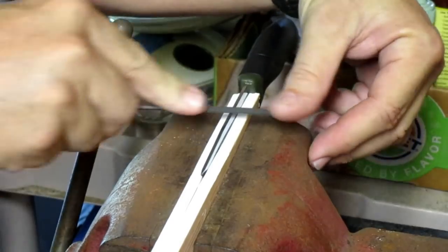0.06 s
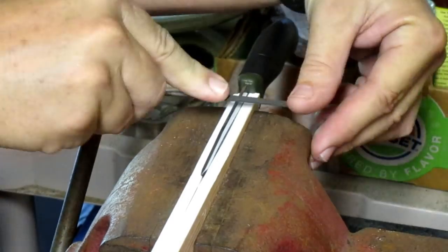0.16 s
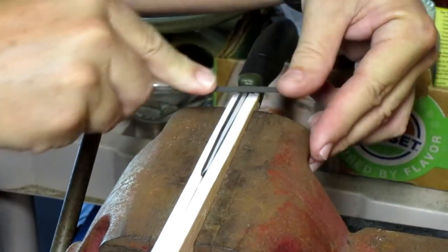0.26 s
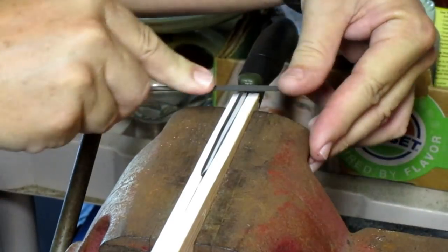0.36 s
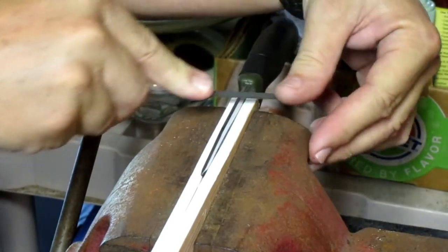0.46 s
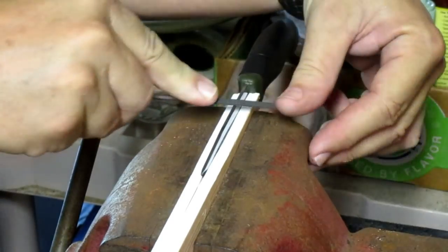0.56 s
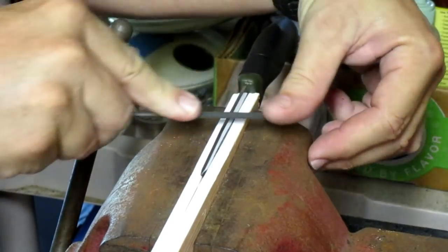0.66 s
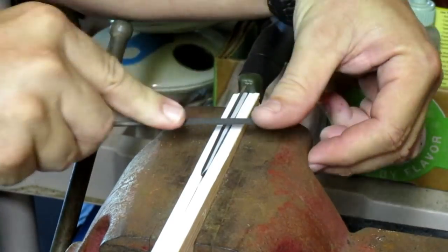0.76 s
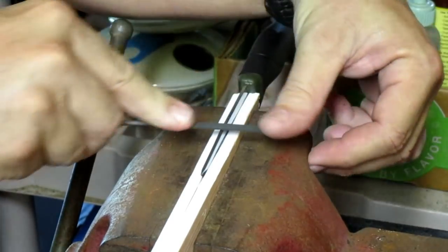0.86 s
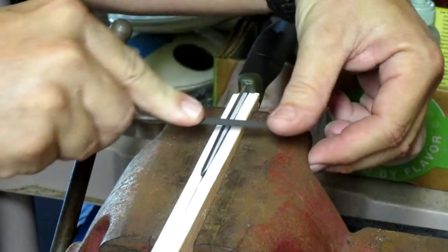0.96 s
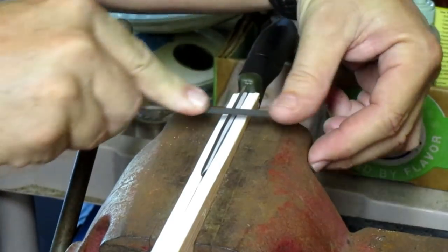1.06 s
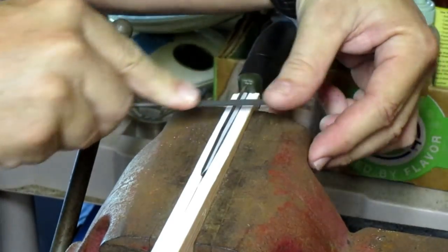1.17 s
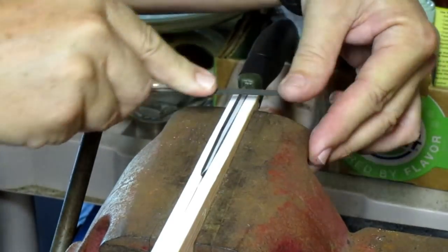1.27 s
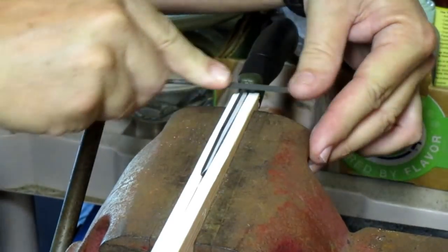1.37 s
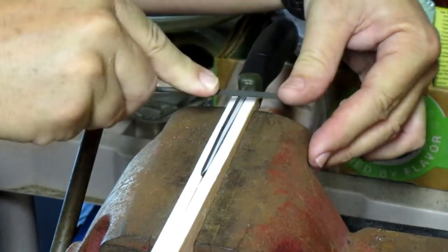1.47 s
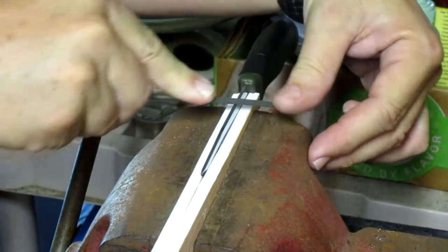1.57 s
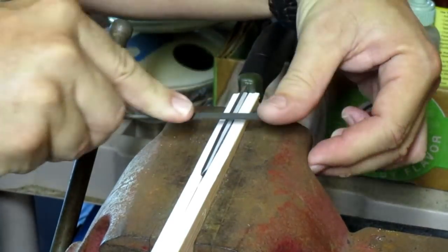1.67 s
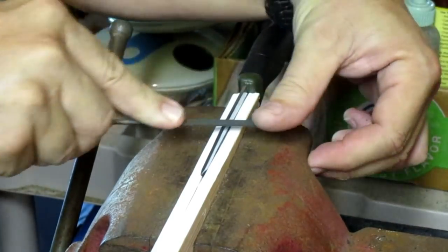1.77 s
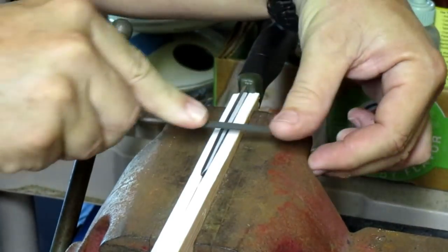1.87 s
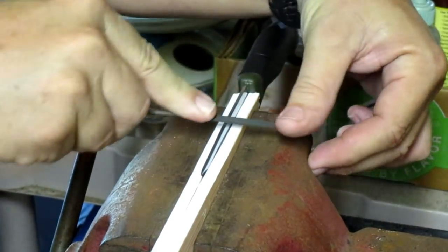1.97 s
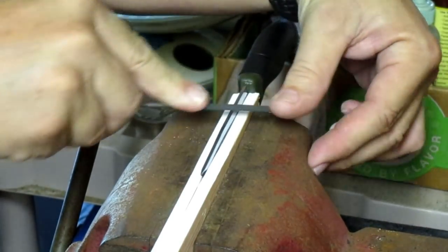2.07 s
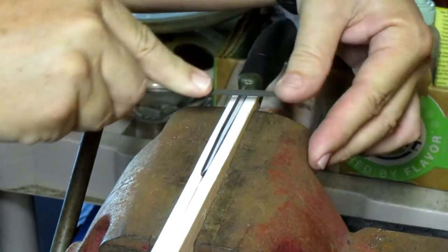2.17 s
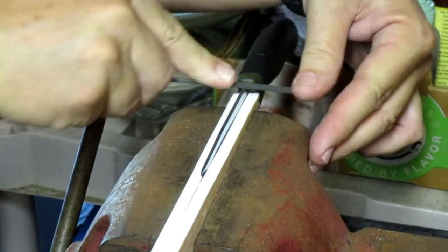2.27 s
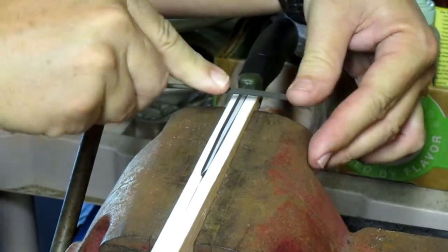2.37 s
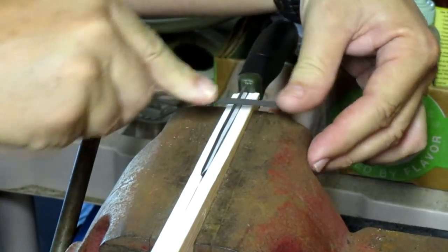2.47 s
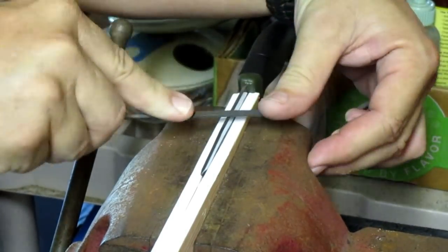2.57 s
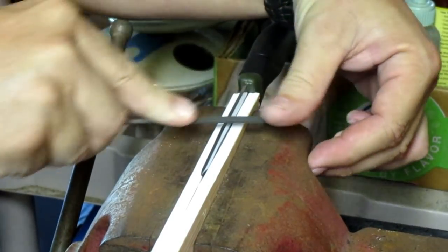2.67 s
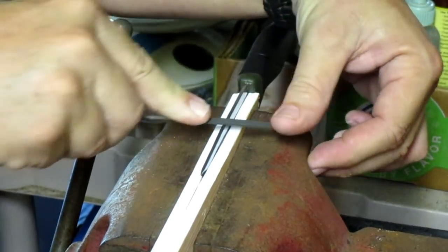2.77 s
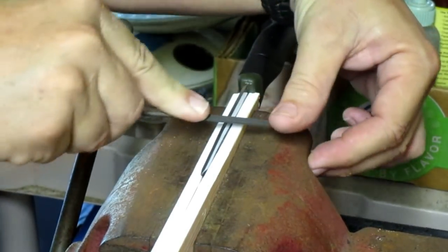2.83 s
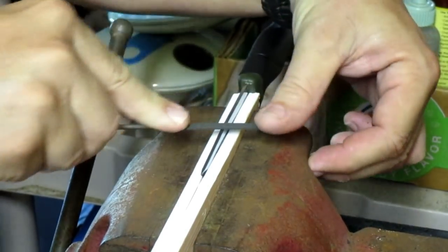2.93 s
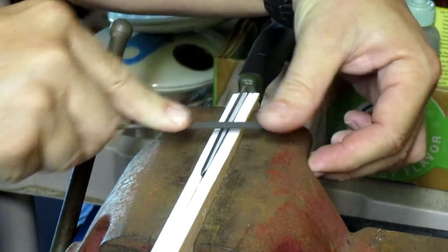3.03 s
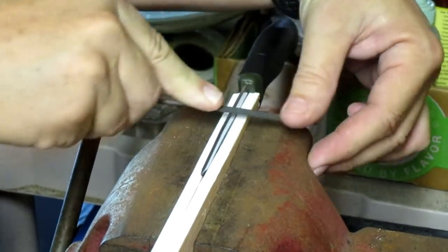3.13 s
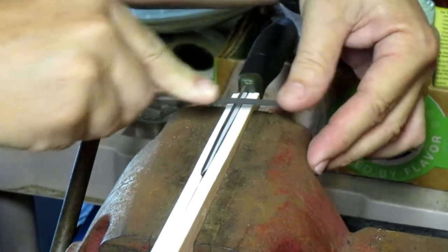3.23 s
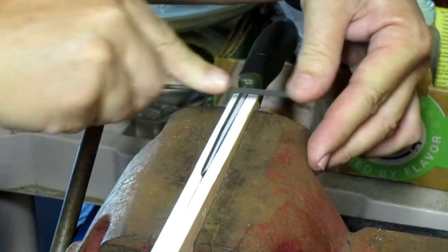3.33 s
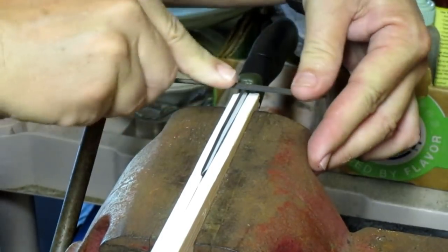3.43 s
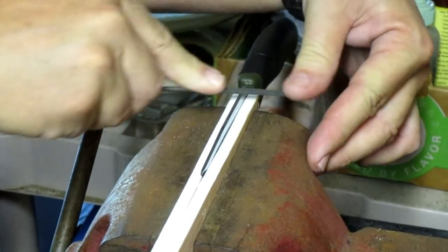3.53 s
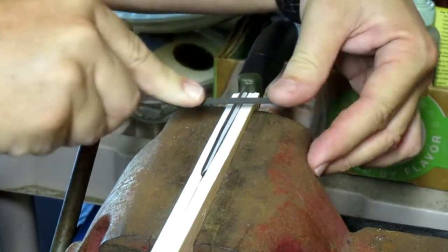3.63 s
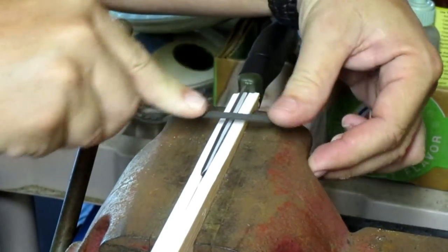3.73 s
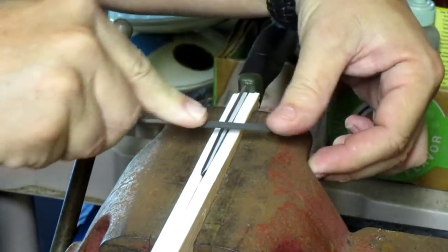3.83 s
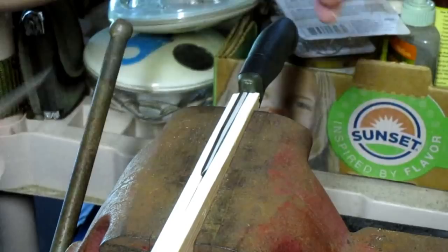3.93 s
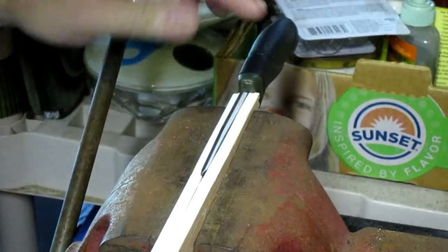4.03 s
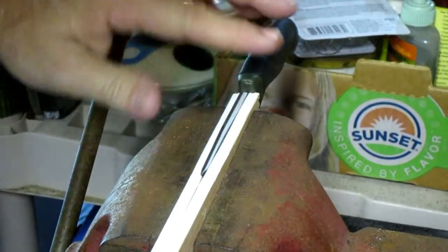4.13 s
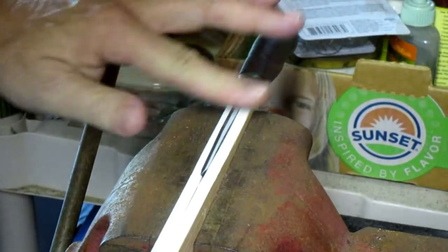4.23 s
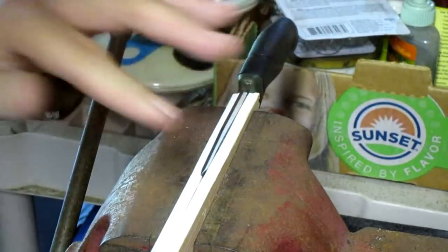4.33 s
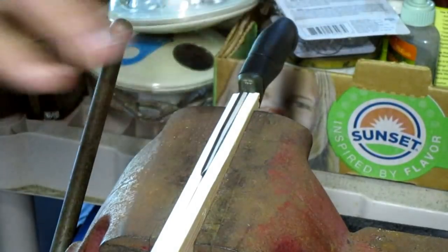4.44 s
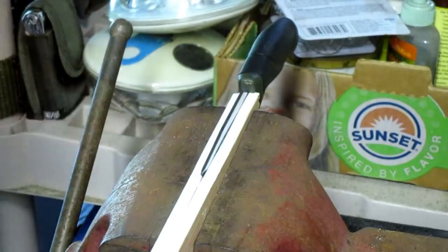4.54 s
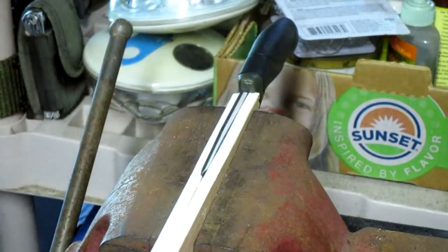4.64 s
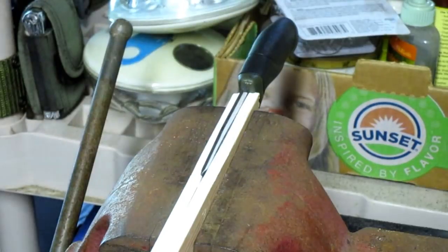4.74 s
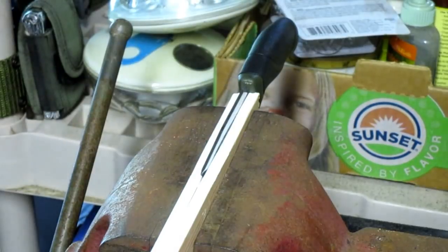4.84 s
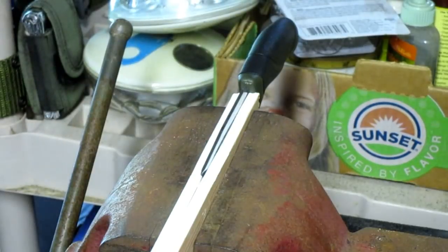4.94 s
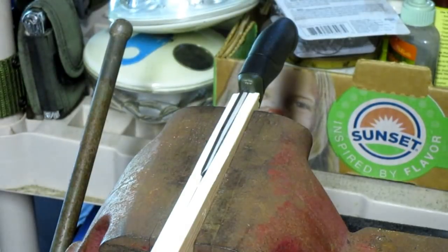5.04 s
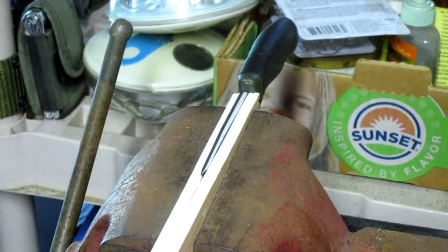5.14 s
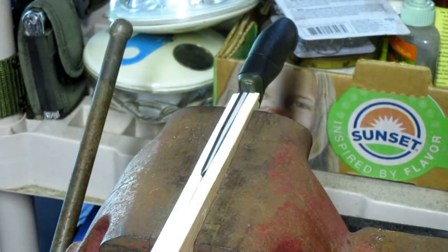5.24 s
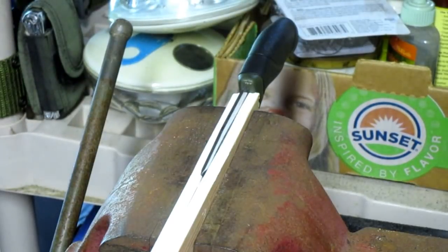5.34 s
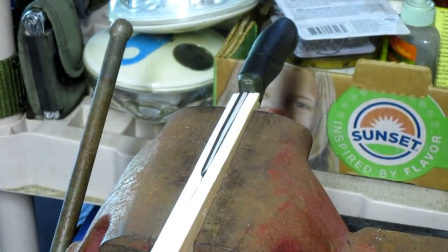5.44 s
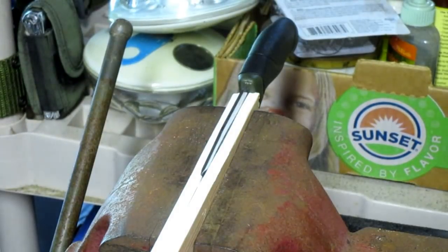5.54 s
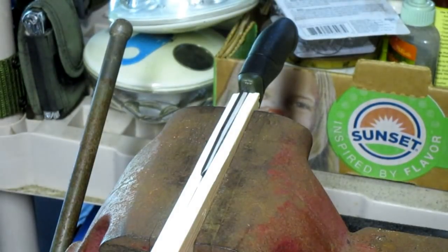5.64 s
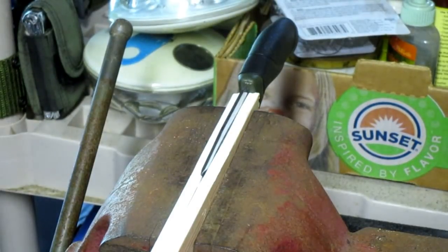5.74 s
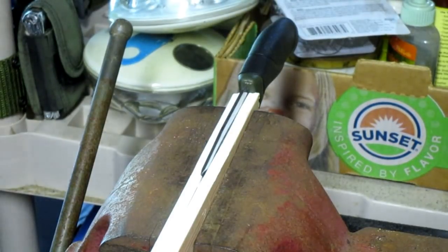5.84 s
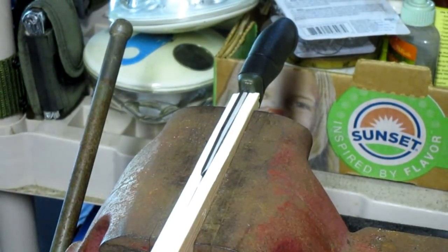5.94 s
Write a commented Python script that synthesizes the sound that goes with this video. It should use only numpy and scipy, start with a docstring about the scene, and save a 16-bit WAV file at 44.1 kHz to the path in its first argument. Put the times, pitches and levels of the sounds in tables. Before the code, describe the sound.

Rapid metallic rasping fills the first four seconds: short harsh strokes in a hurried, irregular rhythm, their tone shifting as the file wanders along the blade. Filing ends dead, leaving quiet air and low wavering hum in a small dry workshop. A few dull bench knocks and tiny metal clicks follow near the end. Close stereo microphone, narrow bass, wider treble.

```python
"""A small hand file is worked quickly to and fro across a steel blade clamped in a bench vise, heard close by.
Its teeth catch and slip a few hundred times a second; this force drives the modes of file, blade and vise,
the vise most when the file is far out on the overhanging blade. Filtered noise makes the bench rumble.
The filing stops dead; soft thumps (damped sines) and small clicks (noise bursts ringing tools) follow,
over the low wavering hum, rumble and air noise of the workshop."""
import sys
import numpy as np
from scipy import signal
from scipy.fft import rfft, irfft
from scipy.io import wavfile
from scipy.ndimage import uniform_filter1d

SR = 44100
rng = np.random.default_rng(int(sys.argv[2]) if len(sys.argv) > 2 else 0)


def dump(signal):
    """Clip the signal to [-1, 1] and save it as 16-bit WAV at the path in sys.argv[1]."""
    limited = np.clip(np.atleast_2d(signal).T, -1, 1)
    pcm = np.round(limited * 32767).astype(np.int16)
    wavfile.write(sys.argv[1], SR, pcm)


N = 264600

# spectrum of the workshop air: [f/Hz, relative level/dB]
AIR_SPECTRUM = [(40, -20), (110, 0), (190, -11), (290, -11), (400, -17), (850, -20), (1500, -25),
                (4000, -32), (8500, -38), (16000, -58)]
# rocking of the bench under the strokes: [t/s, level/dB]
ROCKING_LEVEL = [(0, -32.5), (.6, -33.5), (1.2, -34.5), (2, -32), (3.95, -38)]
# spectrum of the rocking bench: [f/Hz, relative level/dB]
BENCH_SPECTRUM = [(15, -13), (25, 5), (38, 0.5), (55, -10.5), (80, -9.5), (120, -22), (170, -13.5),
                  (230, -23.5), (400, -41), (2000, -110)]
# soft thumps against the bench: [t/s, peak level/dB, f/Hz, t60/s]
BENCH_THUMPS = [(4.25, -26.5, 54.6, 0.14), (5.387, -22, 180, 0.17), (5.401, -20, 148, 0.053),
                (5.417, -23.5, 48, 0.13), (5.519, -26.5, 176, 0.09), (5.531, -26, 61, 0.1)]
# small clicks of tools being handled: [t/s, peak level/dB, t60/s]
TOOL_CLICKS = [(4.008, -34.5, 0.071), (5.496, -30.5, 0.34), (5.5205, -18, 0.022), (5.526, -24, 0.016),
               (5.599, -36, 0.073), (5.841, -36, 0.2), (5.882, -34, 0.079), (5.91, -39.5, 0.5),
               (5.974, -41, .04)]
# resonances of the tools: [f/Hz, width/Hz, relative level/dB]
TOOL_MODES = [(620, 270, 0.5), (1410, 290, 1), (1940, 230, 5), (2800, 900, -1.5), (5160, 2100, -13)]
# resonances of vise, blade and file: [f/Hz, width/Hz, relative level/dB]
STEEL_MODES = [(391.3, 51, -16), (498.6, 63, -13), (549.6, 40, -6.5), (843.7, 60, -12.5), (1064, 37, -19.5),
               (1200, 65, -14.5), (1317, 100, -16), (1458, 54, -16), (1694, 195, -11), (1806, 70, -8),
               (1921, 51, -7), (2007, 55, -9.5), (2241, 57, -6.5), (2317, 110, -3), (2478, 59, 1),
               (2810, 120, -16.5), (3170, 95, -6), (3280, 135, -6.5), (3436, 97, -8.5), (3550, 120, -7),
               (3713, 73, -2.5), (3874, 89, -7.5), (4227, 460, -13), (4920, 240, -19.5), (5296, 210, -12),
               (5880, 420, -10), (6030, 77, -11.5), (7154, 116, -11.5), (7510, 150, -14.5),
               (8570, 180, -23.5), (10230, 154, -17), (11255, 300, -19.5)]
# broad crack of the contact beneath the resonances: [f/Hz, relative level/dB]
CONTACT_CRACK = [(100, -19), (300, -35), (1000, -34), (1600, -39), (2800, -15.5), (4000, -20), (6500, -21),
                 (8500, -21.5), (10000, -24.5), (14600, -28), (16000, -65)]
# a tooth snags hard and lets go: [t/s, peak level/dB]
TOOTH_SNAGS = [(.060, -6), (.331, -7), (.573, -5), (.647, -9), (.693, -7), (1.603, -10), (1.854, -8),
               (1.995, -8), (2.529, -8), (2.646, -8), (2.817, -7), (3.242, -16), (3.2485, -5), (3.369, -17)]
# strokes of the file: [start t/s, length/s, level/dB, swell from first half to second half/dB]
FILE_STROKES = [(0.003, 0.03, -23.5, -13), (0.034, 0.04, -17.5, 2.0), (0.107, 0.032, -25.5, 0.5),
                (0.166, 0.041, -21.5, 3.5), (0.242, 0.031, -24.5, 5), (0.312, 0.034, -24, -3.5),
                (0.375, 0.038, -23.0, 2), (0.436, 0.046, -21.5, -3), (0.486, 0.041, -23.5, 2.0),
                (0.55, 0.057, -19.5, -2), (0.618, 0.038, -17.5, -3), (0.68, 0.04, -20, -4.5),
                (0.737, 0.045, -25.0, -3), (0.804, 0.05, -21.5, -6), (0.86, 0.049, -25.5, -3.0),
                (0.924, 0.034, -20.0, 0), (0.988, 0.05, -26.5, -1.5), (1.051, 0.044, -19.5, 4.5),
                (1.099, 0.038, -15.5, -0.5), (1.168, 0.051, -24.5, -0.5), (1.233, 0.037, -17, 0.5),
                (1.302, 0.039, -25.5, -0.5), (1.366, 0.035, -19.0, -3.0), (1.415, 0.046, -19.5, -7),
                (1.481, 0.028, -26.5, -1), (1.542, 0.021, -27.5, -8), (1.597, 0.043, -22.0, -4),
                (1.648, 0.034, -25.5, 7), (1.714, 0.033, -19, -0.0), (1.779, 0.035, -21.5, -3),
                (1.834, 0.048, -17.5, 0.0), (1.905, 0.032, -19, -6.0), (1.946, 0.062, -21.5, 0.0),
                (2.019, 0.036, -15.5, 0), (2.087, 0.04, -25.0, -1.5), (2.145, 0.041, -19.5, 0.5),
                (2.198, 0.04, -21.5, -1.5), (2.275, 0.047, -22.0, 5.5), (2.325, 0.036, -18.5, 3),
                (2.394, 0.034, -23, -4.5), (2.446, 0.048, -27.0, 2), (2.505, 0.055, -21.0, -5),
                (2.571, 0.04, -22, -0.5), (2.645, 0.047, -20.5, -4.5), (2.701, 0.038, -22.5, 8),
                (2.775, 0.028, -20.5, -5.5), (2.811, 0.056, -18.0, -8.5), (2.876, 0.044, -27.5, 4),
                (2.95, 0.062, -22.5, -4.5), (3.018, 0.053, -24.0, 4), (3.09, 0.062, -22.5, -8),
                (3.158, 0.046, -23.5, 4), (3.247, 0.036, -23.5, -2), (3.298, 0.052, -26.0, 4.5),
                (3.389, 0.036, -24.5, -7), (3.457, 0.034, -21.0, 0.5), (3.522, 0.033, -22.5, 1),
                (3.578, 0.042, -22.5, -6), (3.628, 0.051, -21.0, -0.5), (3.695, 0.043, -23, 2.0),
                (3.765, 0.066, -22.0, -1), (3.842, 0.047, -29.5, 6), (3.901, 0.034, -17.5, 1)]
# the file wanders out along the blade and back, about once a second:
# [t/s, overhang (0 over the jaws, 1 at the free end)]
BLADE_OVERHANG = [(0, 0.32), (.33, 0.76), (.5, 0.87), (.9, 0.025), (1.33, 0.88), (1.55, 0.47),
                  (2.03, 0.071), (2.35, 0.9), (2.55, .35), (2.9, 0.18), (3.42, 0.85), (3.93, 0.14)]
# treble balance of the strokes: [t/s, level/dB]
TREBLE_LEVEL = [(0, -0.5), (.62, 0.5), (.88, -6.5), (1.3, 0), (1.65, 2), (1.82, -3.5), (2.1, -1), (2.65, 0),
                (2.95, -3), (3.22, 4), (3.55, 2), (3.93, 0)]
# side against mid at the two microphone ports: [f/Hz, level/dB]
STEREO_WIDTH = [(150, -61), (380, -42), (1200, -40.5), (2400, -19), (4400, -11), (8000, -6), (14000, -1.5)]

TIME = np.arange(N) / SR  # s
SIZE = 8192  # samples in a body's frequency response
FREQ = np.maximum(np.fft.rfftfreq(SIZE, 1 / SR), 1)  # Hz
TOP_HZ = 15100
STOP_S = 3.933  # the filing ends
AIR_DB = -46
HUM_HZ, HUM_DB = 55, -43
VISE_DB, LEVERAGE_DB = -5, 11.5  # vise level over the jaws, and its rise towards the free end
# chatter (0-1) of an even stroke; one that starts hard and fades chatters more
CHATTER, CHATTER_PER_DB, CHATTER_SPREAD = 0.54, -0.06, 0.23


def undb(db):
    """Amplitude ratio: 20 dB is a factor of ten."""
    return 10 ** (np.asarray(db) / 20)


def unit(x):
    """Normalisation to an rms value of 1."""
    return x / np.sqrt(np.mean(x ** 2))


def add(out, start, sound):
    """Superposition: mix a sound into out from time start/s."""
    i = max(int(start * SR), 0)
    out[i:i + len(sound)] += sound[:N - i]


def curve(points, t):
    """Linear interpolation of a control curve at time t/s."""
    return np.interp(t, *np.transpose(points))


def colour(points, hz):
    """Spectral weighting: gain interpolated in dB over the logarithm of frequency."""
    f, db = np.transpose(points)
    return undb(np.interp(np.log(np.maximum(hz, 1)), np.log(f), db))


def noise(points):
    """Coloured noise: white noise weighted in the frequency domain, rms 1."""
    spectrum = rfft(rng.standard_normal(N))
    return unit(irfft(spectrum * colour(points, np.fft.rfftfreq(N, 1 / SR)), N))


def walk(rate):
    """Slow random fluctuation: levels held for 1 / rate, smoothed twice, rms 1."""
    hold = int(SR / rate)
    steps = np.repeat(rng.standard_normal(N // hold + 1), hold)
    return unit(uniform_filter1d(uniform_filter1d(steps, hold), hold)[:N])


def burst(t60):
    """Crumbling contact: noise under exponential decay, 60 dB in t60/s."""
    t = TIME[:SR // 2]
    return rng.standard_normal(len(t)) * undb(-60 * t / t60)


def resonances(modes, skirt):
    """Modal superposition: the energies of resonance curves add; skirt sets their steepness."""
    energy = 0
    for f, width, db in modes:
        detuning = (FREQ / f - f / FREQ) * f / width
        energy = energy + undb(db) ** 2 / (1 + detuning ** 2) ** skirt
    return np.sqrt(energy)


def ring(push, gain):
    """Minimum-phase response: a body answers a push at once and then rings."""
    # folding the cepstrum forward in time gives the minimum phase
    cepstrum = irfft(np.log(gain + 1e-9))
    cepstrum[1:SIZE // 2] *= 2
    cepstrum[SIZE // 2 + 1:] = 0
    impulse_response = irfft(np.exp(rfft(cepstrum)))[:SIZE // 2]
    return signal.fftconvolve(push, impulse_response)


def blows(rows, body):
    """Impact excitation: short contacts [t/s, peak level/dB, t60/s] ring a body."""
    out = np.zeros(N)
    for start, db, t60 in rows:
        sound = ring(burst(t60), body)
        add(out, start, undb(db) * sound / np.abs(sound).max())
    return out


def echo(x, t60, db):
    """Diffuse reverberation: dense reflections, 1 ms late, decay exponentially."""
    tail = np.concatenate([np.zeros(SR // 1000), burst(t60)])
    return undb(db) * signal.fftconvolve(x, tail / np.sqrt(np.sum(tail ** 2)))[:N]


def ports(mid, scattered=.95):
    """Spatial coherence: two close ports share the bass; treble differs in phase and by scattering."""
    direct = np.sqrt(1 - scattered ** 2) * np.imag(signal.hilbert(mid))
    # the treble scatters off the moving hands
    shifting = sum(echo(mid, t60=0.013, db=-1.5) * walk(20) for _ in range(4)) / 2
    difference = rfft(direct + scattered * shifting)
    side = irfft(difference * colour(STEREO_WIDTH, np.fft.rfftfreq(N, 1 / SR)), N)
    return np.array([mid + side, mid - side])


def workshop(waver=.35, waver_rate=9, rumble_db=-47):
    """Stationary background: coloured noise for air and rumble, and a hum wavering in pitch and level."""
    phase = 2 * np.pi * np.cumsum(HUM_HZ + 1.7 * walk(waver_rate)) / SR
    hum = np.sin(phase) * (1 + waver * walk(waver_rate))
    rumble = noise([(40, -13), (90, -15.5), (1000, -120)])
    return noise(AIR_SPECTRUM) * undb(AIR_DB) + undb(rumble_db) * rumble + undb(HUM_DB) * unit(hum)


def bench(stop_s=0.054, push_s=0.0047, scuff_db=-11, scuff_hz=480):
    """Forced and free vibration: rumble while the file works; each thump starts a damped swing."""
    working = np.clip((STOP_S - TIME) / stop_s + .5, 0, 1)
    out = noise(BENCH_SPECTRUM) * undb(curve(ROCKING_LEVEL, TIME)) * working
    t = TIME[:SR // 2]
    for start, db, hz, t60 in BENCH_THUMPS:
        onset = 1 - np.exp(-t / push_s)
        swing = np.sin(2 * np.pi * hz * t) * undb(-60 * t / t60) * onset
        add(out, start, undb(db) * swing / np.abs(swing).max())
    # only the higher-pitched thumps carry a dull scuff
    scuffs = [(start, db + scuff_db, t60) for start, db, hz, t60 in BENCH_THUMPS if hz > 100]
    return out + blows(scuffs, 1 / (1 + (FREQ / scuff_hz) ** 2))


def clicks():
    """Impact excitation of tools: short noise bursts ring their broad modes, with the extreme treble damped."""
    body = resonances(TOOL_MODES, skirt=0.92) / (1 + (FREQ / 11000) ** 4)
    return blows(TOOL_CLICKS, body)


def snags(steel, t60=0.0071):
    """Stick and sudden release: a caught tooth lets go and rings the steel."""
    return blows([(start, db, t60) for start, db in TOOTH_SNAGS], steel)


def turning(steel, db=-39.5, flutter_db=3, swell_db=2, grit_db=4, vise_db=10, dull_db=-5,
            leverage_db=4, rest_db=-4, rest_s=0.006):
    """Sustained friction: the file stays on the blade, grinding lightly, and keeps the vise ringing."""
    level_db = grit_db * rng.standard_normal(N) + flutter_db * walk(250) + swell_db * walk(14)
    grit = rng.standard_normal(N) * undb(level_db)
    # the grinding eases just before the next stroke
    starts = np.append(np.array(FILE_STROKES)[:, 0], np.inf)
    until_next = starts[np.searchsorted(starts, TIME)] - TIME
    resting = np.exp(-until_next / rest_s)
    effort = undb(leverage_db * curve(BLADE_OVERHANG, TIME) + rest_db * resting)
    force = grit * effort * (TIME < STOP_S)
    balance = colour([(600, vise_db), (1400, 2), (3500, -3.5), (8000, dull_db)], FREQ)
    return undb(db) * unit(ring(force, steel * balance)[:N])


def teeth(along, t, chatter, tooth_hz=330, jitter=.35, scatter_db=4.0, slip_s=0.00042, grit_db=1.5,
          judder_hz=140, judder_db=3, drag=0.51, relief=0.3):
    """Stick-slip friction: teeth catch and slip, quickest in mid-stroke, over the drag of fine grit."""
    chance = rng.standard_normal((96, 3))  # per tooth: spacing, strength, bounce rate
    speed = .7 + .45 * np.sin(np.pi * along)
    travel = np.cumsum(speed) * tooth_hz / SR  # in mean tooth spacings
    tooth = np.searchsorted(np.cumsum(np.exp(jitter * chance[:, 0])), travel)
    age = t - t[np.searchsorted(tooth, tooth)]  # time since this tooth caught
    strength = undb(scatter_db * np.tanh(chance[tooth, 1]))
    slips = strength * age / slip_s * np.exp(1 - age / slip_s)
    # a loosely held file also bounces on the blade
    bounce = np.sin(2 * np.pi * np.cumsum(judder_hz * np.exp(jitter * chance[tooth, 2])) / SR)
    grains, sizes = rng.standard_normal((2, SIZE))[:, :len(t)]
    grit = grains * undb(grit_db * sizes)
    friction = chatter * slips + drag * (1 - relief * chatter)
    return grit * friction * undb(judder_db * chatter * bounce)


def strokes(steel, bite_s=0.0049, lift_s=0.0029, arch_db=2, sizzle_db=2.5, trail_db=-16, trail_s=0.013,
            shift=0.0035, node_db=2, node_hz=2100):
    """Driven modes: each stroke grabs, swells and trails off; the contact point alters the resonances."""
    out = np.zeros(N)
    chances = rng.standard_normal((len(FILE_STROKES), 3))  # chatter, mode shift, sizzle
    for (start, length, db, swell_db), chance in zip(FILE_STROKES, chances):
        t = TIME[:int((length + 2 * trail_s) * SR)]
        along = np.minimum(t / length, 1)
        swell = swell_db * np.clip(2 * along - 1, -.5, .5)
        arch = arch_db * (np.sin(np.pi * along) - 2 / np.pi)
        pressure = undb(swell + arch)
        cutting = np.clip((length - t) / lift_s, 0, 1)
        # a stroke that starts hard bites at once, one that builds up eases in
        bite = np.minimum(t / (bite_s * undb(2 * np.clip(swell_db, -8, 2))), 1)
        # after the cut the file skates on lightly
        trail = undb(trail_db) * np.exp(-np.maximum(t - length, 0) / trail_s)
        chatter = np.clip(CHATTER + CHATTER_PER_DB * swell_db + CHATTER_SPREAD * chance[0], 0, 1)
        force = teeth(along, t, chatter) * bite * np.maximum(cutting, trail) * pressure
        # the leverage of the overhang makes the vise ring more
        vise_db = VISE_DB + LEVERAGE_DB * curve(BLADE_OVERHANG, start)
        treble_db = curve(TREBLE_LEVEL, start)
        balance = colour([(850, vise_db), (1400, 0), (4200, 0), (5800, treble_db),
                          (13000, treble_db + sizzle_db * chance[2])], FREQ)
        body = np.interp(FREQ * (1 + shift * chance[1]), FREQ, steel)
        # modes with a node at the point of contact are driven less
        nodes = undb(node_db * np.sin(2 * np.pi * (FREQ / node_hz + rng.random())))
        sound = ring(force, body * balance * nodes)
        # the level is the rms value over the stroke's length
        add(out, start, undb(db) * sound * np.sqrt(length * SR / np.sum(sound ** 2)))
    return out


def scene(mute_s=0.0036, near_db=-16, room_db=-33):
    """Direct and reflected sound: file and tools with reflections off bench top and dry room, over the background."""
    steel = np.hypot(resonances(STEEL_MODES, skirt=1.547), colour(CONTACT_CRACK, FREQ))
    metal = strokes(steel) + turning(steel) + snags(steel)
    # the file leaves the blade after the last stroke, and the fingers mute its ring
    metal = metal * np.exp(-np.maximum(TIME - STOP_S, 0) / mute_s)
    direct = metal + clicks()
    bench_top = echo(direct, t60=0.03, db=near_db)
    room = echo(direct, t60=0.12, db=room_db)
    return ports(direct + bench_top + room + bench() + workshop())


def record(dry):
    """Amplitude and band limiting: peaks are clipped at full scale, then a steep low-pass cuts the top."""
    low_pass = signal.ellip(8, .2, 70, TOP_HZ, fs=SR, output="sos")
    return signal.sosfilt(low_pass, np.clip(dry, -1, 1))


dry = scene()
out = record(dry)
dump(out)
```